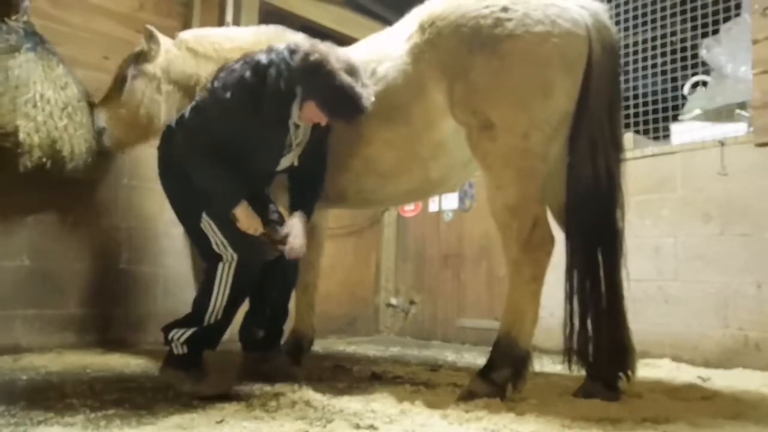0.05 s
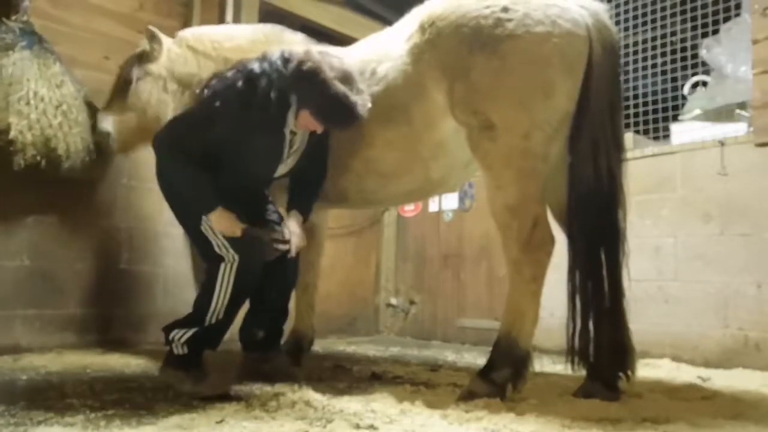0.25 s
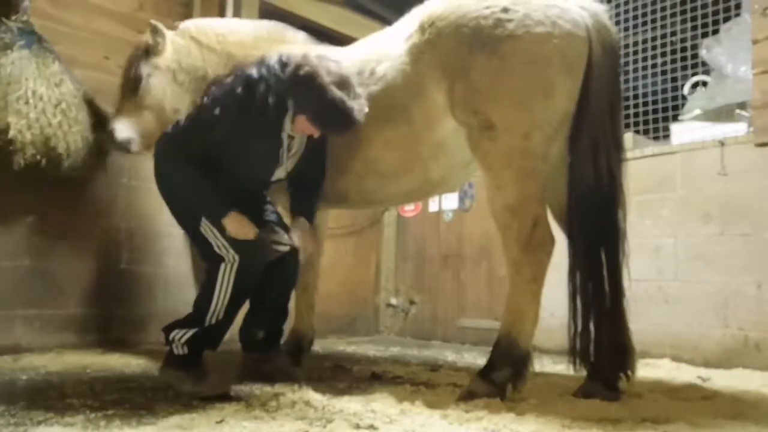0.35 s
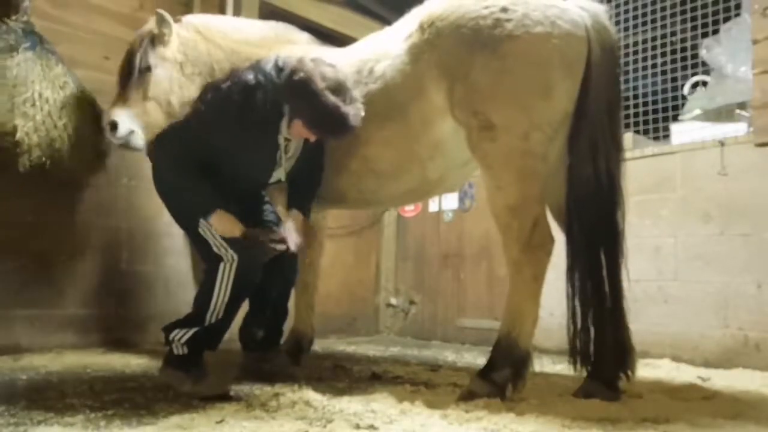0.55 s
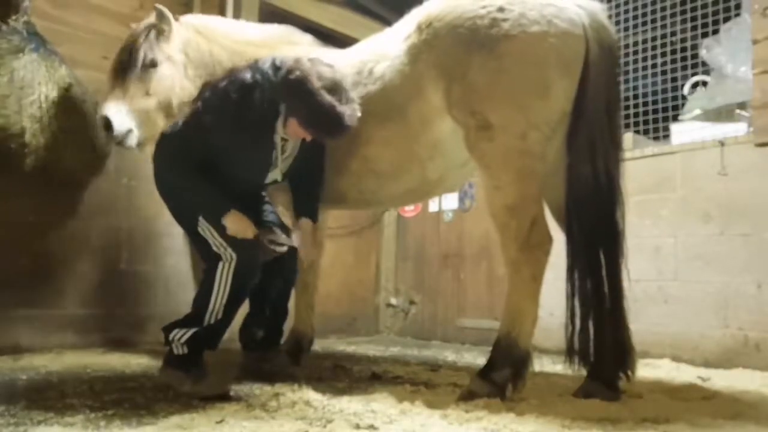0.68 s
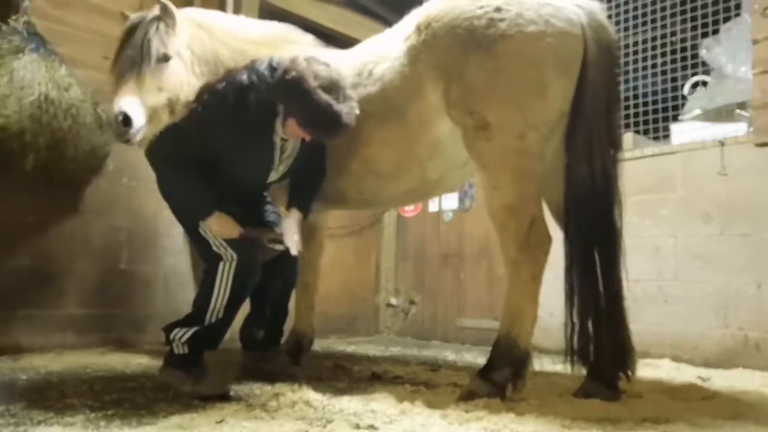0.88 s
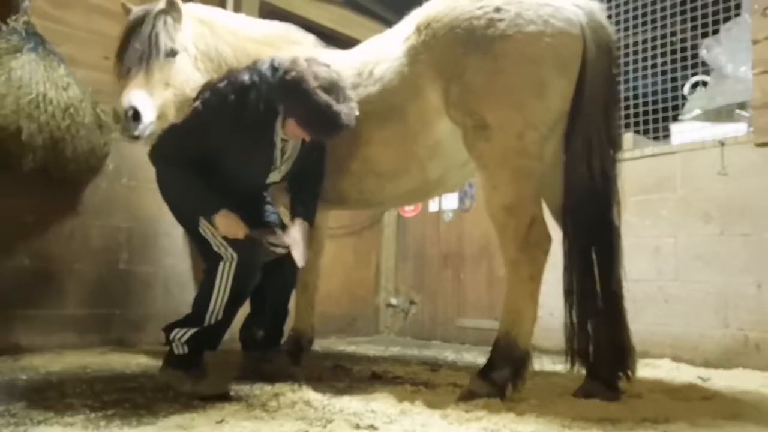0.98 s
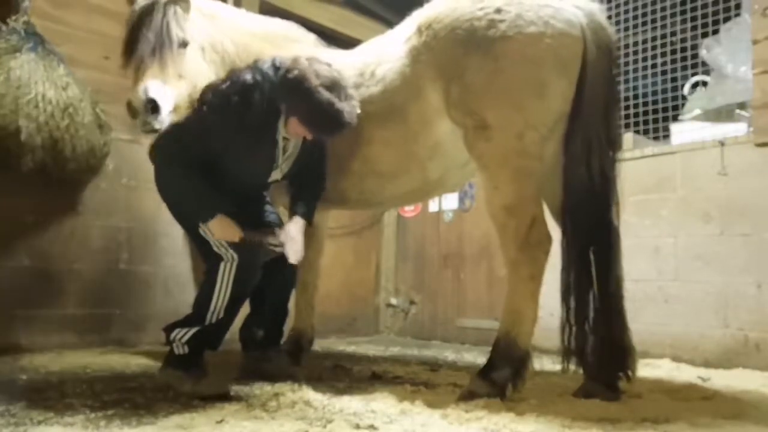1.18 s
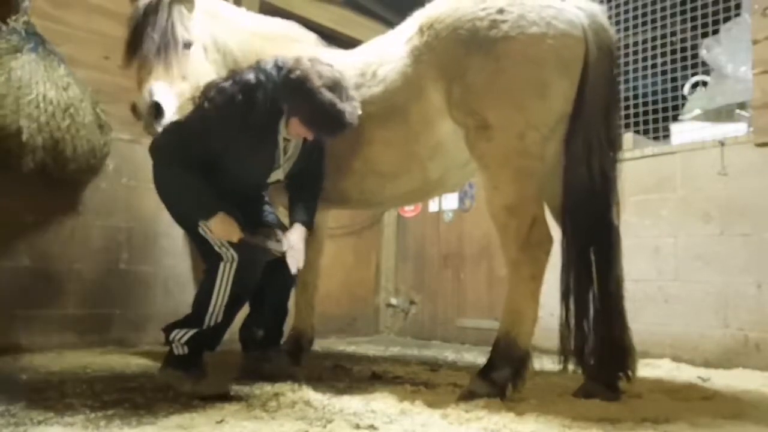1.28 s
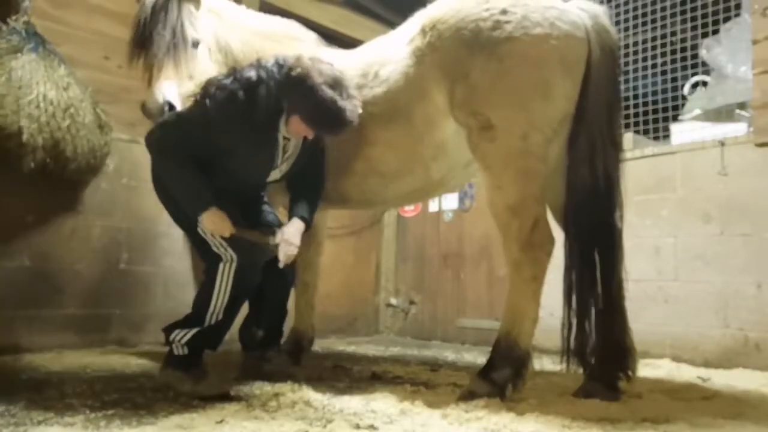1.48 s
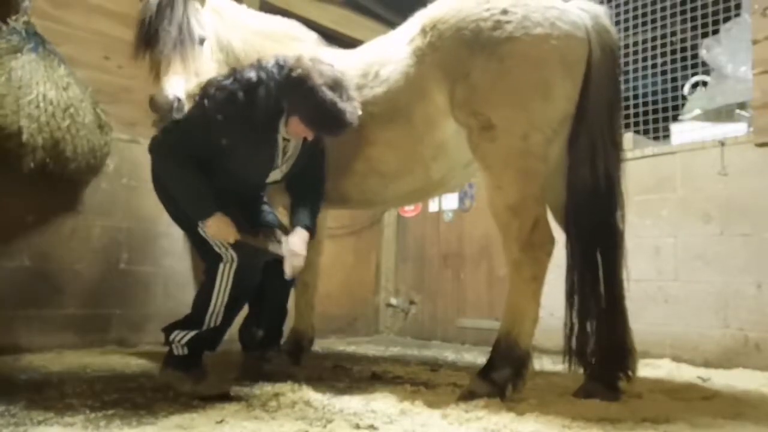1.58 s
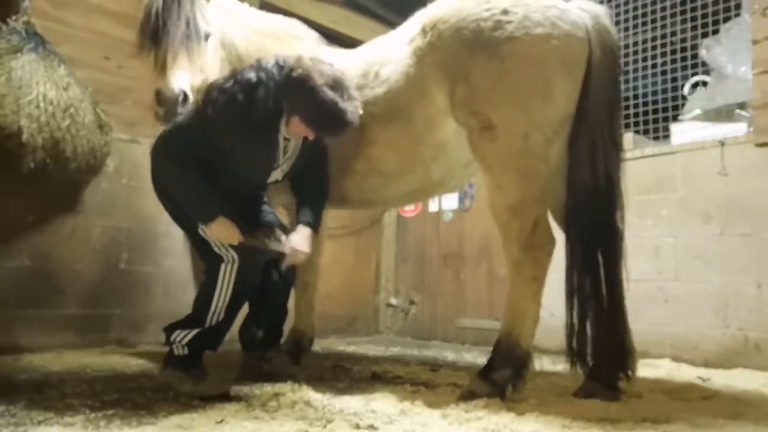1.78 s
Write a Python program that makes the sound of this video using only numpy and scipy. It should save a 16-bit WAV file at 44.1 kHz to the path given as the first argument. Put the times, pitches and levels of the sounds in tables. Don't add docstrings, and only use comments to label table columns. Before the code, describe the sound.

A steel rasp clinks hard, then lightly, on a horse's hoof, followed by a run of short, gritty filing strokes with dull hoof thrum, close in a quiet stall with low rumble and brief echoes.

```python
import sys
import numpy as np
from scipy import signal
from scipy.fft import rfft, irfft
from scipy.io import wavfile
from scipy.ndimage import uniform_filter1d

SR = 44100
rng = np.random.default_rng(int(sys.argv[2]) if len(sys.argv) > 2 else 0)


def wav_out(sig):
    wavfile.write(sys.argv[1], SR, np.round(np.clip(np.atleast_2d(sig).T, -1, 1) * 32767).astype(np.int16))


def boost(x):
    u = np.asarray(x, float) / 20
    return 10 ** u


N = 81585

# (start [s], length [s], bite level [dB], hoof thrum level [dB], hollow boom level [dB])
STROKES = [
    (0.157, 0.059, -56, -53, -54),
    (0.243, 0.2, -52.5, -63, -66.5),
    (0.439, 0.17, -42, -51.5, -49),
    (0.62, .13, -42.5, -44.5, -46.5),
    (0.756, 0.17, -40, -41, -43.5),
    (0.931, 0.13, -41, -47.5, -46),
    (1.059, 0.16, -40, -35.5, -47.5),
    (1.254, .13, -45, -46, -51),
    (1.445, 0.21, -65, -68, -88),
    (1.707, 0.15, -45.5, -57.5, -64.5),
]


def evened(x):
    return x / np.sqrt(np.mean(x ** 2) + 1e-20)


def read(points, hz):
    f, value = np.transpose(points)
    return np.interp(np.log(hz + 1), np.log(f + 1), value)


def colour(x, points):
    return irfft(rfft(x) * boost(read(points, np.fft.rfftfreq(N, 1 / SR))), N)


def resonate(x, hz, width_hz):
    r = np.exp(-np.pi * width_hz / SR)
    return signal.lfilter([1, 0, -1], [1, -2 * r * np.cos(2 * np.pi * hz / SR), r * r], x)


def ports(mid, side):
    return np.array([mid + side, mid - side])


def smooth(x, seconds):
    return uniform_filter1d(x, int(seconds * SR))


def air():
    # (frequency [Hz], level [dB per Hz])
    centre = [(12, -40.5), (20, -45), (111, -5.5), (328, -26), (398, -46.5), (603, -38), (1110, -30),
              (1460, -32), (15000, -40.5)]
    # (frequency [Hz], level [dB per Hz])
    width = [(35, -44), (60, -19.5), (295, -21.5), (355, -23), (399, -4), (514, -32.5), (663, -14.5),
             (875, -23.5), (15000, -32)]
    # (time [s], level [dB])
    rumble_level = [(0.0, -61.5), (0.246, -62.5), (0.4, -52), (0.432, -57.5), (0.602, -49), (0.664, -55),
                    (1.05, -50.5), (1.85, -57)]
    patch_db, centre_db, width_db = 1.5, -63.5, -67.5
    hum_hz, hum_width_hz, hum_db = 108, 6, -66
    rumble_low_hz, rumble_high_hz = 20, 75.6

    hz = np.fft.rfftfreq(1024, 1 / SR)
    a, b, c, d, patch = rng.standard_normal((N // 256 + 5, 513, 5)).T
    patch = uniform_filter1d(uniform_filter1d(patch, size=12, axis=0), size=10, axis=1)
    mid_noise = (a + 1j * b) * boost(read(centre, hz))[:, None]
    side_noise = (c + 1j * d) * boost(read(width, hz))[:, None]
    noise = np.array([mid_noise, side_noise]) * boost(patch_db * evened(patch))
    mid, side = signal.istft(noise, nperseg=1024, noverlap=768)[1][:, :N]

    hum = boost(hum_db) * evened(resonate(rng.standard_normal(N), hum_hz, hum_width_hz))
    band = signal.butter(2, [rumble_low_hz, rumble_high_hz], "band", fs=SR, output="sos")
    rumble = evened(signal.sosfilt(band, rng.standard_normal(N)))
    rumble = rumble * boost(np.interp(np.arange(N) / SR, *np.transpose(rumble_level)))
    return ports(boost(centre_db) * evened(mid) + hum + rumble, boost(width_db) * evened(side))


def clinks():
    # (hard blow level [dB], light blow level [dB], time to fall 60 dB [s],
    # left minus right [dB])
    steel = [(-11.5, -36, 0.039, -10.8), (-10, -21.5, 0.048, -9), (-3, -3.5, 0.05, -2),
             (-22, -24.5, 0.26, 0.5), (-15.5, -20, .09, -4.5), (-16, -6, .11, -4), (-19, -20, .11, -1),
             (-5, -2, .08, -12), (-17, -16, .08, -3), (-3, -8, .05, -7), (-21.5, -9, .1, 1),
             (-32, -31.5, 0.1232, -3), (-49.5, -22, .07, 8.6), (-22.5, -48.5, 0.18, 5.5)]
    steel_hz = [1561, 2159, 2380, 3262, 4352, 5523, 5685, 6925, 7709, 8344, 9740, 11220, 12850, 13740]
    # (time [s], level [dB], tilt [dB per octave], rise [s], lightness [0-1])
    blows = [
        (.157, -60, -15, .0004, .5),
        (.2075, -13.5, 0, .003, 0),
        (.308, -62, -22, .002, .9),
        (.335, -35.5, 0, .0004, 1),
    ]
    # (frequency [Hz], level [dB per Hz])
    crack_tone = [(1000, -24.5), (2500, -2.5), (5000, -14.5), (8500, 2.8), (10200, -11), (11000, -24),
                  (15000, -33.5)]
    tilt_hz = 7170
    twin_spread, twin_db = 0.008, -10
    port_lag_s = 0.00062
    swell_power = 2.2
    rough_amount, rough_s = 0.4, 0.004
    flash_db, flash_s = 9, 0.005
    light_ring, grab_s, grab_db_per_s = 1.5, 0.378, -1200
    crack_db, crack_t60_s = -15.5, 0.13
    tick_db, tick_s = -3, 0.0015
    thud_s, thud_hz, thud_db, thud_t60_s = 0.1645, 500, -31, 0.035

    out = np.zeros((2, N))
    hard_db, light_db, t60, pan_db = np.transpose(steel)[:, :, None]
    t, hz = np.arange(SR // 2) / SR, np.array(steel_hz)[:, None]
    twin_hz = hz * (1 + twin_spread * rng.uniform(0.29, 1, hz.shape) * rng.choice([-1, 1], hz.shape))
    lag = np.pi * port_lag_s * np.array([hz, -hz])
    for start, level_db, tilt_db, rise, light in blows:
        phase = rng.uniform(0, 2 * np.pi, (2, 1, len(hz), 1)) + lag
        mode_db = hard_db + light * (light_db - hard_db) + tilt_db * np.log2(hz / tilt_hz)
        shape = boost(mode_db - 60 * t / t60 / (1 + light_ring * light))
        shake = evened(smooth(rng.standard_normal((2, len(hz), len(t))), rough_s))
        shake = shake * np.minimum(t / flash_s / 2, 1)
        shape = shape * (1 + rough_amount * np.minimum(hz / tilt_hz, 1) * shake)
        shape = shape * boost(grab_db_per_s * np.maximum(start + t - grab_s, 0))
        shape = shape * np.minimum(t / (rise * (tilt_hz / hz) ** swell_power), 1)
        shape = shape * (1 + (1 - light) * boost(flash_db) * np.exp(-t / flash_s))

        ring = np.sin(2 * np.pi * hz * t + phase[0])
        ring = ring + boost(twin_db) * np.sin(2 * np.pi * twin_hz * t + phase[1])
        both = (shape * ring * boost([pan_db / 2, -pan_db / 2])).sum(1)
        crack = evened(colour(rng.standard_normal((2, N)), crack_tone))[:, :len(t)]
        crack = crack * (boost(crack_db - 60 * t / crack_t60_s) + light * boost(tick_db) * np.exp(-t / tick_s))
        at = round(start * SR)
        out[:, at:at + len(t)] += boost(level_db) * (both + np.minimum(t / rise, 1) * crack)

    at = round(thud_s * SR)
    thud = boost(thud_db - 60 * t / thud_t60_s) * np.sin(2 * np.pi * thud_hz * t)
    out[:, at:at + len(t)] += thud * [[-1], [0.5]]
    return out


def pressure(column, peaks, more_db=0):
    starts = [3, 2.4, 2.2, 4.5, 2.3, 5, 2.6, 5, 2.2, 10]
    finishes = [2, 2.4, 2.2, 4, 2.2, 3.5, 2.8, 4.5, 2, 4]
    edge_db = -22
    t, out = np.arange(N) / SR, np.zeros(N)
    for row, peak, start, finish in zip(STROKES, peaks, starts, finishes):
        u = (t - row[0]) / row[1]
        before = abs((peak - u) / peak) ** start
        after = abs((u - peak) / (1 - peak)) ** finish
        away = np.where(u < peak, before, after)
        level_db = row[column] + edge_db * away + more_db * np.minimum(4 * abs(u - peak), 1)
        out += boost(np.maximum(level_db, -200))
    return out


def bites():
    bites_per_s, spread_db, flutter_db, flutter_s = 14000, 1.6, 0.8, 0.012
    size = boost(spread_db * np.minimum(rng.exponential(1, N), 5)) * rng.standard_normal(N)
    flutter = evened(smooth(rng.standard_normal(N), flutter_s))
    return evened(size * (rng.random(N) < bites_per_s / SR) * boost(flutter_db * flutter))


def wander():
    wander_db, wander_s = 3.5, 0.05
    slow = smooth(smooth(rng.standard_normal(N), wander_s), wander_s / 2)
    return boost(wander_db * evened(slow))


def brighten(x):
    treble_db = [-8, 1, 2.5, -4, 4.5, -4.5, 4.5, -4.5, -19.5, 1.5]
    low = signal.sosfiltfilt(signal.butter(2, 4462, fs=SR, output="sos"), x)
    middle = [row[0] + row[1] / 2 for row in STROKES]
    return low + (x - low) * boost(np.interp(np.arange(N) / SR, middle, treble_db))


def scraping(peaks):
    # (frequency [Hz], level [dB per Hz])
    centre = [(180, -25.5), (300, -24), (523, -2), (763, -12), (2480, 7.5), (3120, -0.5), (3920, 0),
              (7670, -5), (15000, -56)]
    # (frequency [Hz], level [dB per Hz])
    width = [(180, -31.5), (300, -4), (416, -15), (801, -19.5), (1570, -2.5), (2040, 1.5), (3920, -7.5),
             (7180, -8), (15000, -47)]
    # (frequency [Hz], resonance width [Hz], level [dB])
    held = [(985, 36, -24), (1148, 95, -17.5), (1772, 270, -15), (2356, 160, -10.5), (2472, 22, -14),
            (2675, 40, -20.5), (3450, 110, -17), (3883, 118.3, -15), (4264, 51, -18.5), (5600, 360, -22),
            (6980, 340, -25), (7640, 450, -17), (8430, 540, -15.5)]
    shared = 0.6
    width_db, lean = 0, 0.076

    grit = bites()
    near = rng.standard_normal(256) * np.exp(-np.arange(256) / 60)
    wide = shared * evened(signal.oaconvolve(grit, near)[:N]) + (1 - shared) * bites()
    level = pressure(column=2, peaks=peaks)
    narrow = pressure(column=2, peaks=peaks, more_db=-3)
    grip = [wander() for row in held]
    pair = []
    for drive, tone in ((grit, centre), (wide, width)):
        ring = np.zeros(N)
        shaped_ring = zip(grip, held)
        for gain, (hz, width_hz, db) in shaped_ring:
            ring += boost(db) * gain * evened(resonate(drive, hz, width_hz))
        broad = evened(colour(drive, tone))
        pair.append((broad * narrow + ring * level) / np.std(broad + ring))
    mid, side = pair
    return brighten(ports(mid, boost(width_db) * side + lean * mid))


def thrum(hz, width_hz, level, mid_db, side_db):
    mid, side = [boost(db) * evened(resonate(resonate(bites(), hz, width_hz), hz, 2 * width_hz)) * level
                 for db in (mid_db, side_db)]
    return ports(mid, side)


def rasping():
    peak_at = [.15, .5, .45, .55, .5, .55, .5, .4, .3, .3]
    hoof_at = [0.075, 0.12, 0.48, 0.68, 0.63, 0.47, 0.46, 0.9, 0.27, 0.73]
    hoof_level = pressure(column=3, peaks=hoof_at, more_db=-4.5)
    boom_level = pressure(column=4, peaks=peak_at)
    hoof = thrum(hz=220, width_hz=41.6, level=hoof_level, mid_db=0, side_db=-19)
    boom = thrum(hz=425.5, width_hz=194, level=boom_level, mid_db=-8, side_db=0)
    return scraping(peak_at) + hoof + boom


def stall(x):
    # (frequency [Hz], time to fall 60 dB [s])
    echo_t60 = [(200, 0.1), (1000, 0.24), (4000, 0.19), (12000, 0.11)]
    taps = np.zeros((2, SR // 2))
    at = np.arange(200, SR // 2 - 20, 20) + rng.integers(0, 20, (2, (SR // 2 - 201) // 20))
    np.put_along_axis(taps, at, rng.choice([-1., 1.], at.shape), 1)
    hz, t, z = signal.stft(taps, SR, nperseg=256)
    fade = boost(-60 * t / read(echo_t60, hz)[:, None])
    tail = signal.istft(z * fade, SR, nperseg=256)[1]
    return signal.fftconvolve(x, tail / np.linalg.norm(tail[0]), axes=1)[:, :N]


def scene():
    room, steel, scrape = air(), clinks(), rasping()
    echo = stall(boost(-8) * steel + boost(-10.5) * scrape)
    return room + steel + scrape + echo


def low_pass(x):
    return signal.sosfilt(signal.butter(12, 15100, fs=SR, output="sos"), x)


def record(dry):
    # (frequency [Hz], level [dB])
    mic = [(20, 3), (9000, 0.5), (10500, -2.5), (12500, -9.5), (15500, -3.5)]
    return low_pass(colour(dry, mic))


dry = scene()
out = record(dry)
wav_out(out)
```